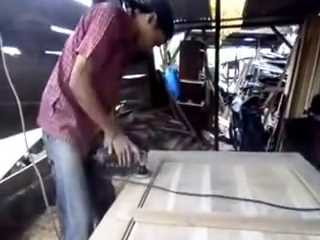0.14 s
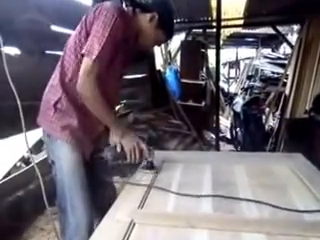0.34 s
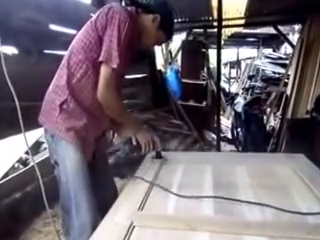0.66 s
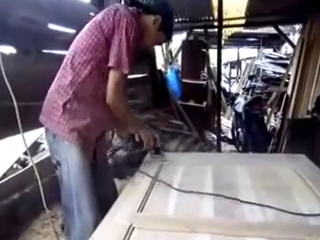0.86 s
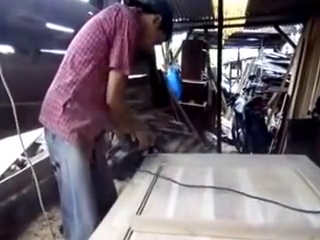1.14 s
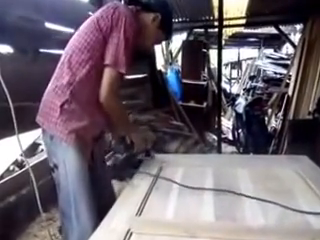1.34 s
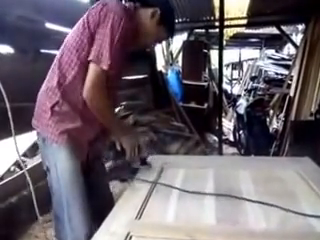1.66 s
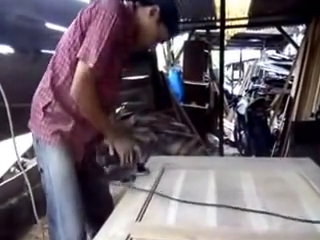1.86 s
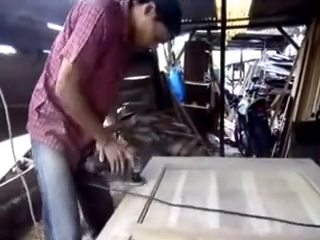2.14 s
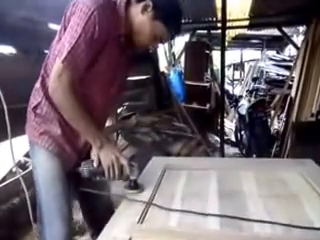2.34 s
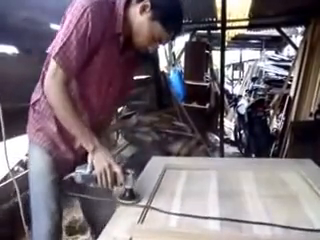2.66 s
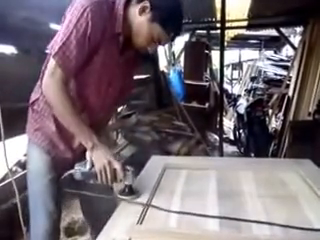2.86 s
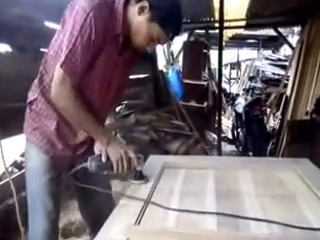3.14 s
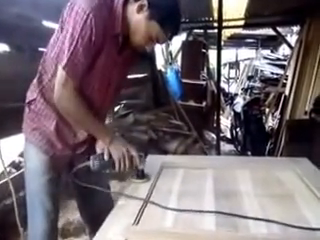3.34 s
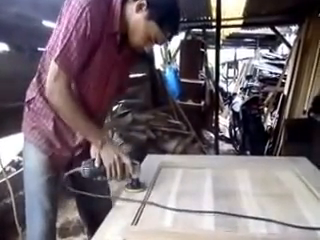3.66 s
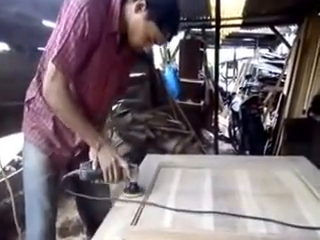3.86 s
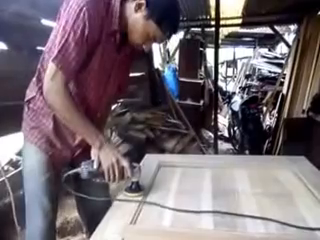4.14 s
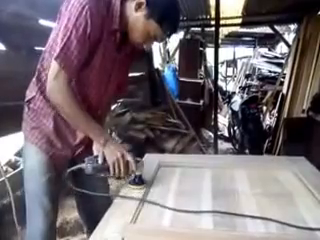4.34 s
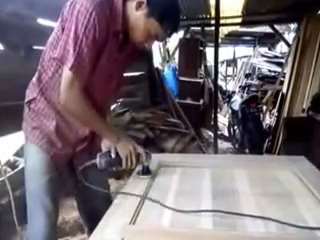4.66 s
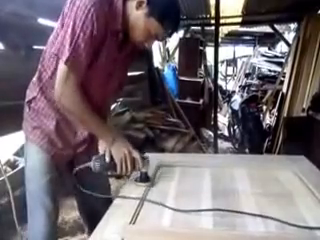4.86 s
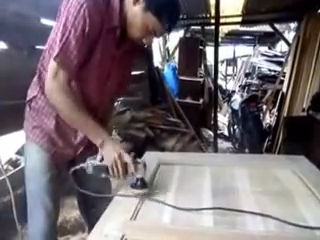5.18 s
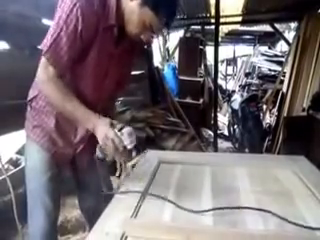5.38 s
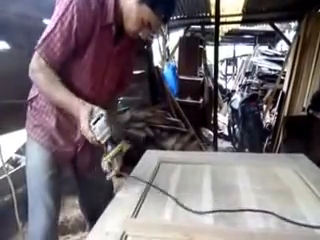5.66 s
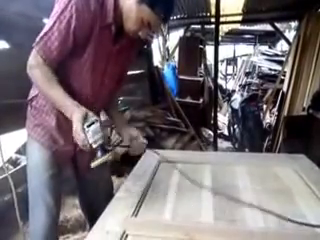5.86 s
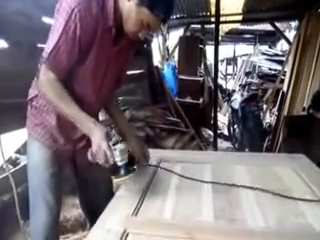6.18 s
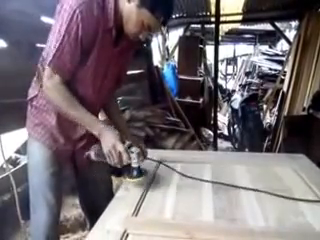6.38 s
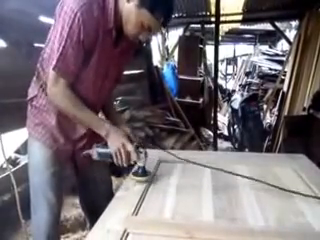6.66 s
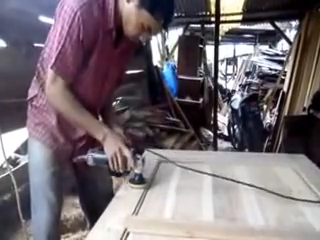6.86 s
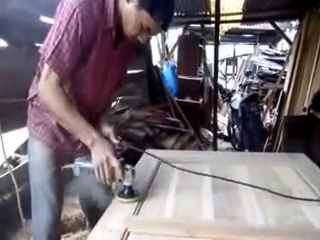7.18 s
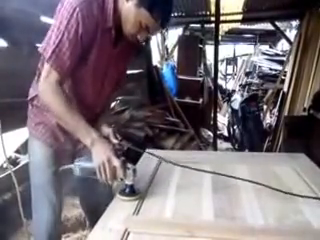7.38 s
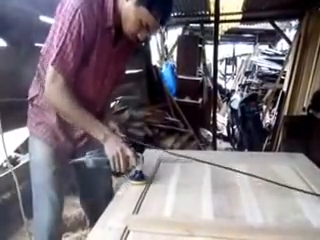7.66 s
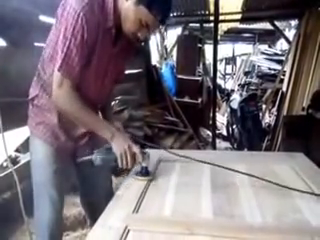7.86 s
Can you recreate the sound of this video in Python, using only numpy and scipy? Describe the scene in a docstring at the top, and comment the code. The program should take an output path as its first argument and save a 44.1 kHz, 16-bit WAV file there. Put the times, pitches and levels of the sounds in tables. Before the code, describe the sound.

A hand-held electric grinder sands a wooden panel throughout, close to the microphones in an open workshop. From 0 to 1.5 s the motor climbs from about 5 kHz fan whine to roughly 5.6 kHz, with a thin, very high whistle briefly during the rise. The piercing whine flickers and swells from side to side until about 3.3 s, above broad gritty hiss, rushing air and fluttering low rumble. Around 3.4 s a first lean pulls the pitch down; a stronger one near 4.5 s makes the motor labour and its gears sing. It recovers about 5-5.5 s, then sags sharply around 6-6.3 s with a brief gear squeal, recovers, and sags again around 7.3-7.7 s with growling drone and panel resonance. Pitch starts recovering near 8 s. Scraping pulses rapidly with the disc, and mains hum surfaces faintly later.

```python
"""In an open workshop a hand-held angle grinder sands a wooden door panel.
The motor runs up to speed, its fan blades whining past the vents, then sags each time the disc is leant on the wood.
Under load the meshing gears sing and the panel resonates with the wobbling disc; the pad flaps and the panel rumbles.
Grit scrapes as coloured noise that pulses once a disc turn, the cooling air hisses, and mains hum sounds in the panel.
"""
import sys
import numpy as np
from scipy import signal
from scipy.fft import rfft, irfft, next_fast_len
from scipy.io import wavfile
from scipy.ndimage import uniform_filter1d

SR = 44100
rng = np.random.default_rng(int(sys.argv[2]) if len(sys.argv) > 2 else 0)


def master(y):
    """Save y as 16-bit WAV."""
    cut = np.clip(np.atleast_2d(y).T, -1, 1)
    pcm = np.round(cut * 32767)  # scale
    wavfile.write(sys.argv[1], SR, pcm.astype(np.int16))


N = 353241
TIME = np.arange(N) / SR  # s
BLADES, PINION_TEETH, CROWN_TEETH, MAINS_HZ = 12, 13, 37, 50
FLAT_DB, PAD_SHARE = -28, 0.71  # scuffing with the disc flat, dB of pad and disc tone per dB of scuffing

# How broadly the disc lies on the wood, least at the panel's far corner.
# Each row: time in seconds, scuffing level in dB.
CONTACT_LEVEL = [(0, -31.5), (1.1, -32.5), (1.5, -35.5), (1.8, -31), (2.3, -31), (3.4, -27), (4.6, -27.5),
                 (6.3, -29.5), (8, -29.5)]


def gain_of(db):
    """Level law: converts decibels to an amplitude ratio."""
    return np.exp(np.asarray(db) * (np.log(10) / 20))


def evened(x):
    """Energy normalization: scales a signal to rms 1."""
    return x / np.sqrt(np.mean(x ** 2) + 1e-20)


def curves(rows):
    """Linear interpolation: the columns of a timed table, one value a sample."""
    seconds, *columns = np.transpose(rows)
    return [np.interp(TIME, seconds, column) for column in columns]


def read(points, hz):
    """Spectral interpolation: reads a table of frequencies on a log-frequency axis."""
    f, value = np.transpose(points)
    return np.interp(np.log(hz + 1), np.log(f + 1), value)


def wander(rate_hz):
    """Low-pass random process: slow motion of rms 1, up to about the given rate."""
    size, coarse_rate = 16384, 2000  # samples, samples per second
    hz = np.fft.rfftfreq(size, 1 / coarse_rate)
    rolloff = 1 + (hz / rate_hz) ** 4
    slow = irfft(rfft(rng.standard_normal(size)) / rolloff)
    return evened(np.interp(TIME, np.arange(size) / coarse_rate, slow))


def broken(rate_hz, bias):
    """Random intermittency: switches softly between 0 and 1, on for longer at a higher bias."""
    return .5 + .5 * np.tanh(3 * (wander(rate_hz) + bias))


def tone(turns, scatter, width_hz, lag=0):
    """Multipath interference: a line of rms 1, direct sound plus reflections that shift as the tool moves."""
    angle = (2 * np.pi * (turns - np.floor(turns))).astype(np.float32)
    in_phase, across = wander(width_hz), wander(width_hz)
    reflected = (in_phase * np.cos(angle) - across * np.sin(angle)) / np.sqrt(2)
    direct = np.cos(angle - np.float32(lag))  # lag in radians
    return evened(direct + scatter * reflected)


def stack(turns, orders, scatter, width_hz):
    """Harmonic series: rough lines on whole multiples of one rotation."""
    return sum(gain_of(db) * tone(round(k) * turns, scatter, width_hz) for k, db in orders)


def noise(colour, lag_s=0.00012):
    """Partial coherence: coloured noise at two microphones, reaching the left one first."""
    # Each row: frequency in Hz, left minus right level in dB.
    balance = [(100, 1.33), (400, 2.86), (900, 6), (1700, 4.44), (3000, 5.29), (3800, 6.39), (4600, 3.7),
               (5400, 1.17), (6100, 0.14), (6600, -2), (7500, -4)]
    # Each row: frequency in Hz, likeness of the two sides from 0 to 1.
    likeness = [(100, 0.63), (600, 0.43), (1600, 0.37), (2300, 0.23), (4500, 0.43), (6500, 0.57),
                (7500, 0.037)]
    size = next_fast_len(N, True)
    hz = np.fft.rfftfreq(size, 1 / SR)
    left, other = rfft(rng.standard_normal((2, size)))
    same = np.clip(read(likeness, hz), 0, 1)
    delay = np.exp(-2j * np.pi * hz * lag_s)
    right = (same * left + np.sqrt(1 - same ** 2) * other) * delay
    lean = gain_of(read(balance, hz) / 2)
    spectrum = np.array([left * lean, right / lean]) * gain_of(read(colour, hz))
    return evened(irfft(spectrum, size)[:, :N])


def shifting(x, depth_db, width_hz, length_s):
    """Moving reflections off the panel: patches of the hiss brighten and dull as the tool moves."""
    z = signal.stft(x, nperseg=512)[2]
    patches = rng.standard_normal(z.shape[1:])
    spans = [width_hz * 512 / SR, length_s * SR / 256]  # in bins and frames
    for axis, span in enumerate(spans):
        keep = np.exp(-1 / span)
        for _ in range(2):  # smooth twice
            patches = signal.lfilter([1 - keep], [1, -keep], patches, axis)
    return evened(signal.istft(z * gain_of(depth_db * evened(patches)), nperseg=512)[1][:, :N])


def motor_speed(pressure):
    """Rotational inertia: turns per second follow late to a settling speed that pressure lowers."""
    start_hz, free_hz = 414.6, 468.7  # turns per second at first and running free
    sag_hz, inertia_s = 200, .513  # settling speed lost at pressure 1, time constant
    keep = np.exp(-1 / (inertia_s * SR))
    settling = free_hz - sag_hz * pressure
    return start_hz + signal.lfilter([1 - keep], [1, -keep], settling - start_hz)


def fan_whine(rotor, whine_db, lags):
    """Blade-passing tone: blades cross the vents, and the whine swells as the vents swing past."""
    fade_db, fade_hz = 2, 22  # depth and pace of chance fading
    on_axis_db = -12.5  # ceiling: the vents face a microphone squarely
    level_db = np.array([side_db + fade_db * np.tanh(wander(fade_hz)) for side_db in whine_db])
    whine = np.array([tone(BLADES * rotor, scatter=.4, width_hz=18, lag=lag) for lag in lags])
    return gain_of(np.minimum(level_db, on_axis_db)) * whine


def fan_octave(rotor, speed):
    """Second blade-passing harmonic: a fitful octave, lost at the highest speeds."""
    # Each row: frequency of the octave in Hz, level in dB.
    octave_colour = [(7500, -39), (9000, -37), (10450, -35), (10650, -40), (10800, -89)]
    level = gain_of(read(octave_colour, 2 * BLADES * speed))
    return level * broken(rate_hz=9, bias=.5) * tone(2 * BLADES * rotor, scatter=1, width_hz=60)


def whistle(speed):
    """Fixed-frequency line: a thin, steady high whistle sounds briefly during the run-up."""
    whistle_hz, whistle_db = 10990, -36
    at_hz, range_hz = 443, 5  # the moment is timed by the speed curve, in turns per second
    near = np.exp(-np.minimum(abs(speed - at_hz) / range_hz, 3) ** 4)
    rising = np.gradient(speed) > 0
    return gain_of(whistle_db) * near * rising * tone(whistle_hz * TIME, scatter=2, width_hz=60)


def gears(rotor, disc, speed, load, lags):
    """Gear meshing: tooth contacts make a tone with fainter companions, throbbing once a disc turn."""
    # The gear tone sings under heavy load. Each row: time in seconds, level in dB.
    mesh_level = [(0, -42), (3.29, -42), (3.44, -28), (3.7, -40), (4.12, -40), (4.25, -27), (4.5, -26),
                  (4.75, -30), (5.2, -36), (5.7, -34), (6.05, -27), (6.2, -28), (6.3, -22), (6.42, -36),
                  (7.0, -37), (7.3, -25), (7.5, -21.5), (7.72, -23), (8, -33)]
    # Lines of an uneven pinion. Each row: multiple of the rotor speed, level against the gear tone in dB.
    sidebands = [(14, -7), (15, -14)]
    # The housing colours those lines as they glide. Each row: frequency in Hz, gain in dB.
    housing = [(4350, 1.5), (4700, -6), (5000, 2), (5300, 1.5), (5600, -8.5)]
    # Shrill lines that come and go under heavy load. Each row: multiple of the rotor speed, level in dB.
    strain_orders = [(25, -39), (26, -36)]
    mesh_db, = curves(mesh_level)
    throb = evened(1 + .3 * np.cos(2 * np.pi * disc))
    heavy = np.clip(4 * load - 2.6, 0, 1)
    sides = []
    for lag in lags:
        singing = tone(PINION_TEETH * rotor, scatter=.7, width_hz=14, lag=lag)
        for k, db in sidebands:
            line = tone(k * rotor, scatter=1.3, width_hz=22, lag=lag)
            singing = singing + gain_of(db + read(housing, k * speed)) * line
        strain = 0
        for k, db in strain_orders:
            line = tone(k * rotor, scatter=3, width_hz=80)
            strain = strain + gain_of(db) * broken(rate_hz=12, bias=0) * line
        sides.append(gain_of(mesh_db) * throb * singing + heavy * strain)
    return np.array(sides) * gain_of([[0], [-3.5]])  # left, right


def rotor_drone(rotor, load):
    """Rotating unbalance: rotor harmonics, with a buzz where heavy mains current pulses the drone."""
    # Each row: multiple of the rotor speed, relative level in dB.
    rotor_orders = [(1, 5.5), (2, -1.5), (3, -1), (4, 0.5)]
    # Each row: time in seconds, level of the drone in dB before a fixed trim.
    drone_level = [(0, -47.5), (.6, -43.5), (1.6, -44), (1.88, -59), (2.1, -49), (2.6, -44.5),
                   (4.25, -41.5), (4.4, -58), (4.62, -36), (4.88, -55), (5.1, -47.5), (5.5, -45),
                   (5.88, -57), (6.05, -38), (6.3, -49), (6.5, -49), (6.8, -51), (7.08, -71), (7.4, -40.5),
                   (7.65, -39.5), (7.8, -50), (8, -58)]
    buzz_db = -37  # at full load
    drone_db, = curves(drone_level)
    # the current's pulsing puts a rough line above the drone
    buzz_line = tone(rotor + 2 * MAINS_HZ * TIME, scatter=1.5, width_hz=22)
    unbalance = gain_of(drone_db - 1.0) * stack(rotor, rotor_orders, scatter=0.59, width_hz=26)
    return unbalance + gain_of(buzz_db) * load ** 3 * buzz_line


def panel_boom(disc, disc_hz, pressure, load):
    """Forced resonance: the panel booms when the wobbling disc's turning rate meets its own frequency."""
    # Overtones of the disc beating on the wood. Each row: multiple of the disc speed, relative level in dB.
    disc_orders = [(2, -7.5), (3, -12)]
    panel_hz, panel_width_hz = 138.2, 9.5
    boom_db, boom_press_db = -17.5, -20.5  # level, and its change per unit of pressure
    beating_db = 3  # gain of the overtones at full load
    resonance = 1 / (1 + (2 * (disc_hz - panel_hz) / panel_width_hz) ** 2)
    boom = load * gain_of(boom_db + boom_press_db * pressure) * resonance
    beating = load * gain_of(beating_db) * stack(disc, disc_orders, scatter=0.94, width_hz=23)
    return boom * (tone(disc, scatter=0.032, width_hz=8.5) + beating)


def disc_tones(disc, spurts):
    """Rotational harmonics: rough tones at once and twice the disc speed, the upper breaking in at random."""
    once_db = -43  # level of the tone at the disc speed, with the disc flat
    twice_db = -43  # level of the broken tone at twice the disc speed
    scuff_db, = curves(CONTACT_LEVEL)
    once_level = gain_of(once_db + PAD_SHARE * (scuff_db - FLAT_DB))
    once = spurts * once_level * tone(disc, scatter=1.2, width_hz=22)
    twice = gain_of(twice_db) * broken(rate_hz=14, bias=-.7) * tone(2 * disc, scatter=1, width_hz=20)
    return once + twice


def pad_flap(disc, disc_hz, load):
    """Periodic excitation: the backing pad flaps four times a turn, less under load."""
    # Each row: flapping frequency in Hz, gain in dB.
    flap_colour = [(430, -9), (480, 6.5), (520, -10), (585, 1), (620, 4), (660, -2)]
    pad_flaps = 4  # per turn
    flap_db, flap_load_db = -38.5, -14.5  # level with the disc flat, its change at full load
    scuff_db, = curves(CONTACT_LEVEL)
    level_db = flap_db + PAD_SHARE * (scuff_db - FLAT_DB) + flap_load_db * load ** 2
    level_db = level_db + read(flap_colour, pad_flaps * disc_hz)
    return gain_of(level_db) * tone(pad_flaps * disc, scatter=1.8, width_hz=19.7)


def flutter(depth_db, gap_db):
    """Random amplitude modulation: bass in quick spurts while the scuffing is weak, with brief dips."""
    # Each row: middle of a dip in seconds, its length in seconds.
    bass_gaps = [(.66, 0.11), (.9, 0.038), (0.999, 0.062), (1.73, 0.077), (1.885, 0.047)]
    flutter_below_db = -31.5  # scuffing level below which the bass flutters
    scuff_db, = curves(CONTACT_LEVEL)
    depth = depth_db * np.clip((flutter_below_db - scuff_db) / 2, 0, 1)
    bursts = np.tanh(2.5 * wander(rate_hz=14) + 1.3) - .72
    gaps = 0
    for middle, length in bass_gaps:
        gaps = gaps + np.exp(-np.minimum(abs(2 * (TIME - middle) / length), 3) ** 4)
    return gain_of(depth * bursts + gap_db * gaps)


def panel_rumble(load, spurts):
    """Random excitation: the bouncing pad stirs the panel, whose upper resonance speaks under load."""
    # Rumble all but stops while the pad runs smoothly.
    # Each row: time in seconds, level in dB before the trims below.
    rumble_level = [(0, -37), (.85, -39), (1.25, -37), (1.75, -47), (1.98, -35), (2.2, -62), (2.45, -40),
                    (2.8, -50), (3.45, -37.5), (6, -34.5), (8, -36.5)]
    # Each row: frequency in Hz, relative level in dB.
    rumble_colour = [(20, -21), (45, -8), (90, 3.5), (140, 7.5), (190, -5.5), (240, -36), (400, -86.5)]
    # Each row: frequency in Hz, relative level in dB.
    knock_colour = [(120, -25), (220, 0.5), (280, -2), (360, -3.5), (450, -1), (700, -67)]
    knock_flicker_db = 9  # how unevenly the pad knocks
    level_db, = curves(rumble_level)
    rumble = gain_of(level_db - 2.0 + 1.4 * wander(rate_hz=83)) * spurts * noise(rumble_colour)
    pressed_db = 12.9 * np.minimum(load * 3, 1)
    flicker_db = knock_flicker_db * np.tanh(wander(rate_hz=6.0))
    knock = gain_of(level_db - 18.0 + pressed_db + flicker_db) * noise(knock_colour)
    return rumble + knock


def grit(disc):
    """Abrasive friction: scuff, rasp and hiss of the grit, scraping hardest once a disc turn."""
    # Each row: time in seconds, level of the rasp in dB before a fixed trim.
    rasp_level = [(0, -26.5), (.25, -22), (1.05, -21.5), (1.25, -20.5), (1.95, -19.5), (2.3, -29),
                  (2.6, -21.5), (7.2, -22.5), (8, -23.5)]
    # Each row: time in seconds, level of the hiss in dB.
    hiss_level = [(0, -17.5), (.35, -17), (.5, -17.5), (1, -19), (1.45, -20.5), (1.8, -17), (2.15, -17),
                  (2.4, -17), (2.7, -16), (3.5, -17), (4.4, -16), (5.2, -17), (5.7, -16.5), (6.4, -18),
                  (7.2, -18), (8, -18.5)]
    # Colours of the three noises. Each row: frequency in Hz, relative level in dB.
    scuff_colour = [(280, -26.5), (390, 1.5), (470, 7.5), (560, 6.5), (660, 7), (850, 12.5), (1020, 8.5),
                    (1250, 11.5), (1900, -59.5)]
    rasp_colour = [(500, -63.5), (1050, -5), (1250, 5.5), (1420, 8), (1600, 12.5), (1800, 8), (2000, 5.5),
                   (2300, -28.5), (3500, -42), (9000, -62.5)]
    hiss_colour = [(500, -64), (1300, -20.5), (2000, 0), (2400, 1.5), (3100, 2), (3600, 4.5), (4500, 4.5),
                   (5200, 0), (6200, 0.5), (7500, -37), (9000, -100.5)]
    (scuff_db,), (rasp_db,), (hiss_db,) = curves(CONTACT_LEVEL), curves(rasp_level), curves(hiss_level)
    bite = evened(1 + 0.021 * tone(disc, scatter=0.78, width_hz=15))
    scuff = gain_of(scuff_db + 1.04 * wander(rate_hz=16.0)) * noise(scuff_colour)
    rasp = gain_of(rasp_db - 3.0 + 1.1 * wander(rate_hz=17)) * noise(rasp_colour)
    patchy = shifting(noise(hiss_colour), depth_db=1.0, width_hz=125, length_s=0.054)
    hiss = gain_of(hiss_db + 0.78 * wander(rate_hz=21)) * patchy
    return bite * (scuff + rasp + hiss)


def cooling_air(slowing):
    """Turbulent flow: air and brushes hiss, less as the fan slows, pulsing at twice the mains frequency."""
    # Each row: frequency in Hz, relative level in dB.
    air_colour = [(1500, -59.5), (4000, -3), (4700, 2), (5300, 6), (5900, 0.5), (6500, 3.5), (7100, -2.5),
                  (7600, -12.5), (8100, -35.5), (11000, -69)]
    # Each row: time in seconds, gain of the air in dB.
    air_aim = [(0, -0.64), (1, -0.12), (1.75, 1.9), (2.4, -1.3), (4, -0.75), (5, -0.73), (7, -0.37),
               (8, -2)]
    air_db, air_load_db = -18, -3  # base level, and its change at the slowest speed
    aim_db, = curves(air_aim)
    pulse = 1 + 0.051 * np.sin(2 * np.pi * 2 * MAINS_HZ * TIME)
    rush = shifting(noise(air_colour), depth_db=1.04, width_hz=140, length_s=0.08)
    level_db = air_db + aim_db + air_load_db * np.sqrt(slowing) + 1.25 * wander(rate_hz=33)
    return gain_of(level_db) * pulse * rush


def mains_hum():
    """Magnetic force at twice the mains frequency: a hum with an octave, passed on by the panel."""
    # Each row: multiple of twice the mains frequency, relative level in dB.
    hum_orders = [(1, -18), (2, 0.5)]
    # Each row: time in seconds, level in dB before a fixed trim.
    hum_level = [(0, -79), (1.5, -87.5), (2.1, -55), (3.3, -52.5), (4.1, -39), (4.6, -57), (5.0, -37),
                 (5.7, -54.5), (6.45, -29.5), (7.0, -45), (7.6, -36.5), (8, -32)]
    hum_db, = curves(hum_level)
    return gain_of(hum_db + 1.0) * stack(2 * MAINS_HZ * TIME, hum_orders, scatter=0.54, width_hz=30)


def scene():
    """Kinematic coupling: hand pressure sets one shaft speed, which drives the fan, gears and disc."""
    # The hand leans four times and eases off in between.
    # Each row: time in seconds, pressure beyond the tool's own weight with 1 a hard lean.
    hand_pressure = [(0.0, 0.0), (1.61, -0.005), (3.17, 0.008), (3.38, 0.787), (3.54, 0.606), (3.6, 0.261),
                     (4.1, 0.326), (4.52, 1.01), (4.93, 0.23), (5.51, 0.258), (5.98, 1.082), (6.21, 0.861),
                     (6.32, 0.145), (6.77, 0.295), (7.04, 0.529), (7.33, 1.077), (7.64, 0.932),
                     (7.89, -0.093), (8.0, 0.413)]
    # The whine at each microphone, before chance fading and its ceiling, as the vents swing past.
    # Each row: time in seconds, level in dB.
    whine_left = [(0.0, -17.0), (0.07, -20.5), (0.16, -13.0), (0.32, -21.0), (0.35, -28.0), (0.4, -13.0),
                  (0.53, -21.5), (0.56, -28.0), (0.66, -11.5), (0.9, -15.5), (0.97, -30.5), (1.02, -19.5),
                  (1.12, -14.5), (1.19, -22.5), (1.28, -10.5), (1.8, -17.5), (1.82, -31.0), (1.92, -15.5),
                  (2.12, -12.5), (2.18, -21.0), (2.26, -13.5), (2.45, -16.5), (2.54, -17.5), (2.64, -18.5),
                  (2.66, -37.0), (2.71, -14.5), (3.08, -21.5), (3.11, -27.5), (3.22, -15.5), (3.45, -25.0),
                  (3.49, -17.0), (3.77, -23.0), (3.8, -36.5), (3.87, -13.5), (3.96, -28.0), (4.19, -15.5),
                  (4.28, -25.0), (4.32, -35.0), (4.41, -20.0), (4.85, -19.5), (4.94, -26.0), (5.04, -16.0),
                  (5.08, -21.5), (5.7, -18.0), (5.89, -29.0), (6.0, -17.0), (6.2, -19.0), (6.23, -38.0),
                  (6.29, -21.5), (6.34, -27.5), (6.47, -20.0), (6.53, -26.0), (6.62, -15.5), (6.72, -29.0),
                  (6.79, -21.5), (7.03, -21.0), (7.11, -32.0), (7.24, -19.0), (7.3, -17.0), (7.4, -30.5),
                  (7.6, -13.5), (7.71, -13.0), (7.78, -32.0), (7.84, -22.0), (7.98, -21.5), (8.0, -41.0)]
    whine_right = [(0.0, -19.5), (0.19, -23.5), (0.24, -16.5), (0.41, -17.5), (0.45, -25.0), (0.49, -10.0),
                   (0.53, -27.5), (0.57, -11.0), (0.65, -11.5), (0.71, -20.5), (0.76, -10.5), (0.82, -20.5),
                   (0.92, -8.0), (0.98, -21.0), (1.08, -23.5), (1.22, -14.0), (1.35, -24.0), (1.45, -10.0),
                   (1.65, -29.0), (1.72, -15.0), (1.8, -19.0), (1.84, -30.5), (1.88, -8.0), (1.94, -19.0),
                   (2.01, -14.5), (2.19, -12.5), (2.21, -23.0), (2.31, -11.0), (2.37, -30.5), (2.39, -17.5),
                   (2.5, -18.5), (2.59, -31.5), (2.82, -27.5), (2.99, -11.5), (3.27, -16.5), (3.36, -24.0),
                   (3.7, -19.0), (3.74, -28.5), (4.02, -19.5), (4.25, -26.0), (4.46, -23.0), (4.54, -29.5),
                   (4.82, -22.5), (4.9, -28.5), (5.06, -24.5), (5.46, -19.5), (5.58, -36.5), (5.64, -16.5),
                   (5.68, -16.0), (5.75, -35.0), (5.77, -28.0), (6.0, -23.5), (6.32, -44.0), (6.36, -26.5),
                   (6.6, -31.5), (6.66, -22.5), (6.74, -41.5), (6.84, -23.5), (7.09, -31.0), (7.26, -19.0),
                   (7.3, -36.0), (7.35, -27.0), (7.55, -32.0), (7.6, -23.0), (7.91, -29.5), (8.0, -36.0)]
    facing_db = -17  # whine level above which the direct sound outweighs its reflections
    pressure, = curves(hand_pressure)
    speed = motor_speed(pressure)
    # load is the speed lost to the wood; slowing also counts the run-up (both 0-1)
    sag = np.maximum(motor_speed(np.zeros(N)) - speed, 0)
    load = sag / sag.max()
    slowing = (speed.max() - speed) / np.ptp(speed)
    rotor = np.cumsum(speed) / SR  # turns
    gearing = PINION_TEETH / CROWN_TEETH
    disc, disc_hz = rotor * gearing, speed * gearing
    spurts = flutter(depth_db=8.5, gap_db=-30)
    # reflections swirl the high tones between the microphones, except while the direct whine is strong
    whine_db = curves(whine_left) + curves(whine_right)
    facing = np.clip((whine_db[0] - facing_db) / 4, 0, 1)
    swirl = (1 - facing) * (1.1 + 1.0 * wander(rate_hz=7))
    lags = (0, .7 + swirl)  # left, right, in radians
    shrill = (fan_octave(rotor, speed) + whistle(speed)) * gain_of([[0], [-14]])
    low = rotor_drone(rotor, load) + panel_boom(disc, disc_hz, pressure, load)
    low = low + disc_tones(disc, spurts) + pad_flap(disc, disc_hz, load) + mains_hum()
    return (fan_whine(rotor, whine_db, lags) + shrill + gears(rotor, disc, speed, load, lags)
            + low * gain_of([[1.2], [-1.3]])
            + panel_rumble(load, spurts) + grit(disc) + cooling_air(slowing))


def gate(x):
    """Noise gating: each band is turned down while weak, leaving the low mids hollow and patchy."""
    # Each row: frequency in Hz, threshold in dB.
    thresholds = [(40, -54), (130, -52), (300, -50.5), (580, -46.5), (750, -46.5), (1050, -46.5),
                  (1500, -63.5), (2500, -79)]
    depth_db, knee_db = -20, 1.5  # how far and how abruptly the gate shuts
    hz, _, z = signal.stft(x, SR, nperseg=1024, noverlap=768)
    power = (abs(z) ** 2).mean(0)
    for axis in (0, 1):  # smooth over neighbouring bins, then frames
        power = uniform_filter1d(power, size=3, axis=axis)
    under_db = read(thresholds, hz)[:, None] - 10 * np.log10(abs(power) + 1e-14)
    shut = .5 + .5 * np.tanh(under_db / knee_db)
    return signal.istft(z * gain_of(depth_db * shut), SR, nperseg=1024, noverlap=768)[1][:, :N]


def record(dry):
    """Gating, clipping and band-limiting: the gate acts, the peaks are clipped, the top is cut."""
    edge_hz = 11170
    held = np.clip(gate(dry), -.97, .97)
    lowpass = signal.firwin(511, edge_hz, window=("kaiser", 9), fs=SR)
    return signal.oaconvolve(held, lowpass[None], "same")


dry = scene()
out = record(dry)
master(out)
```